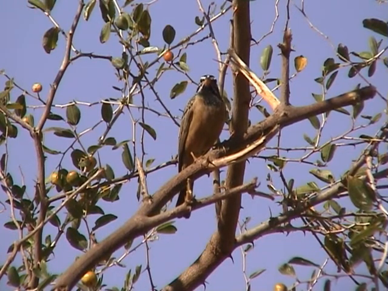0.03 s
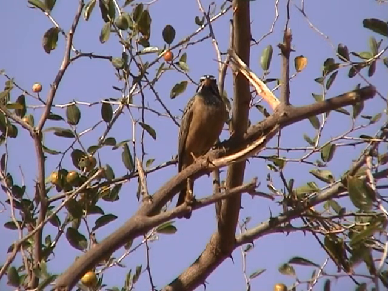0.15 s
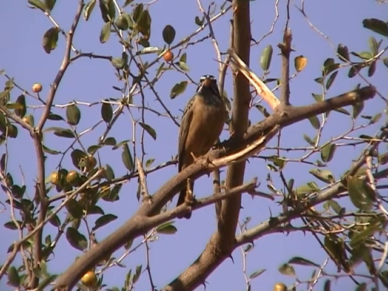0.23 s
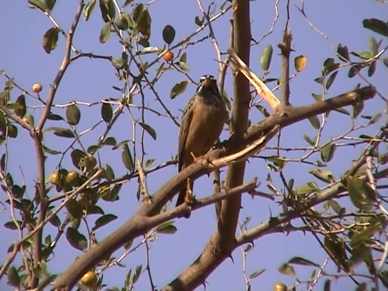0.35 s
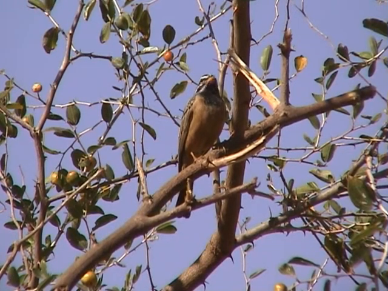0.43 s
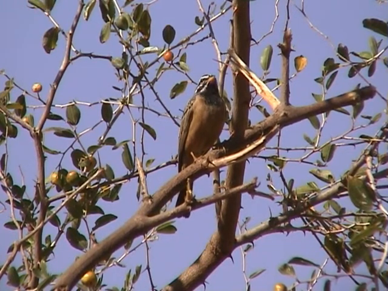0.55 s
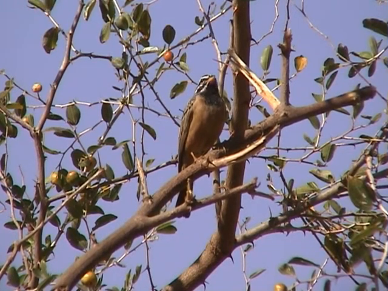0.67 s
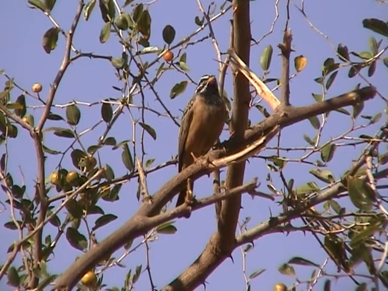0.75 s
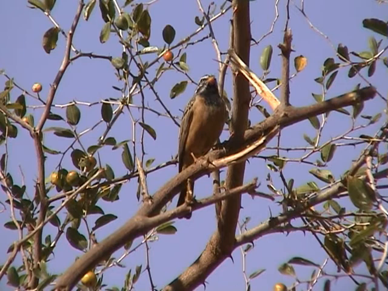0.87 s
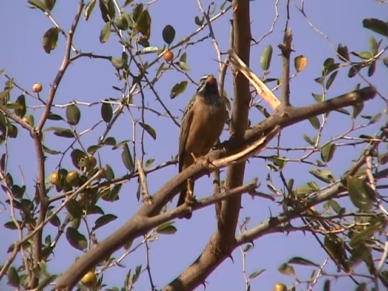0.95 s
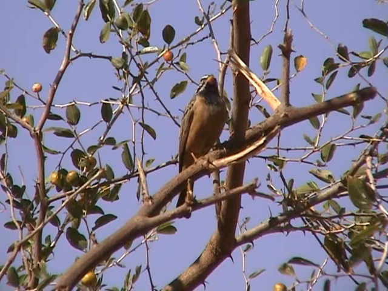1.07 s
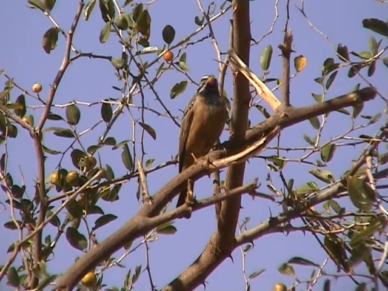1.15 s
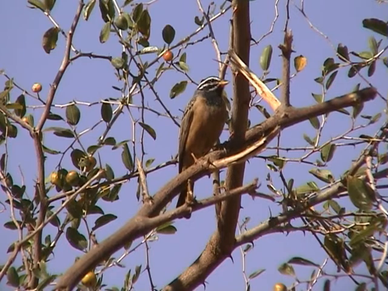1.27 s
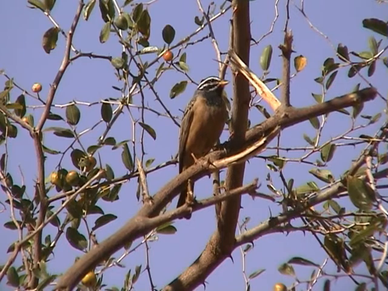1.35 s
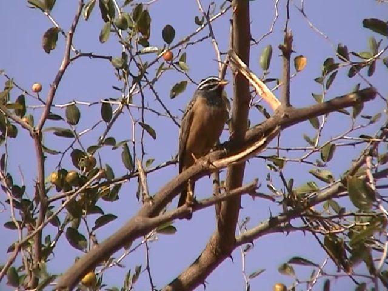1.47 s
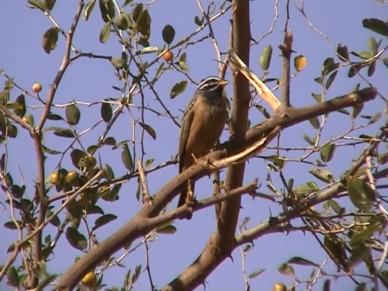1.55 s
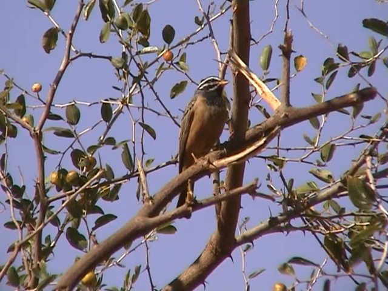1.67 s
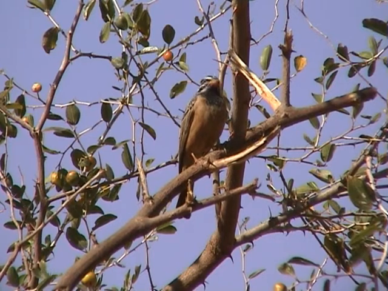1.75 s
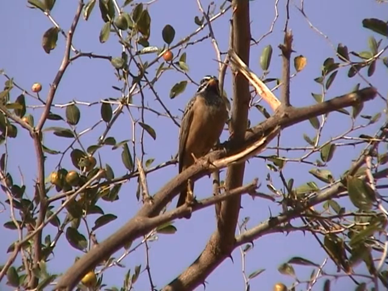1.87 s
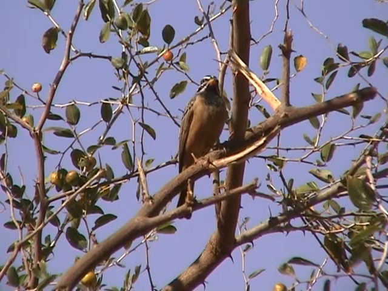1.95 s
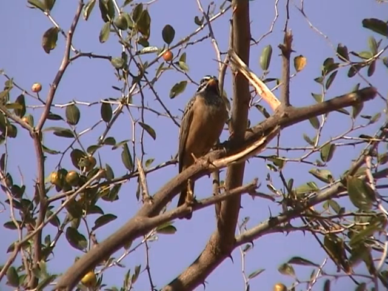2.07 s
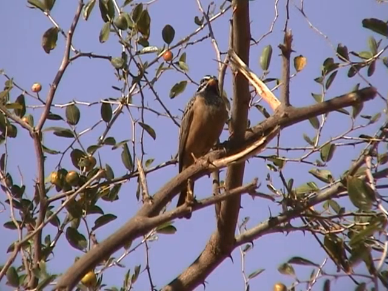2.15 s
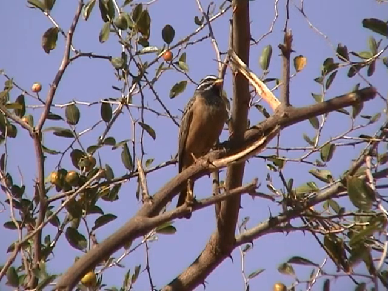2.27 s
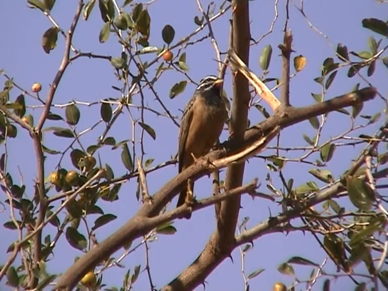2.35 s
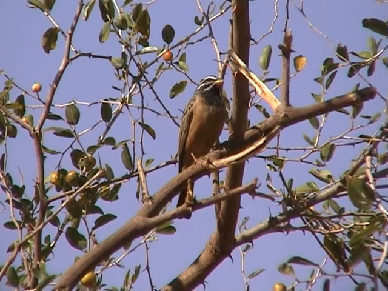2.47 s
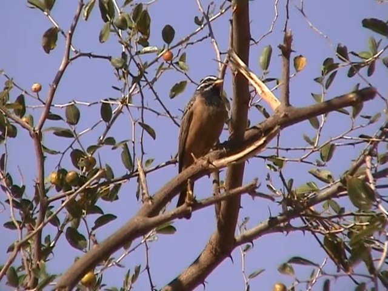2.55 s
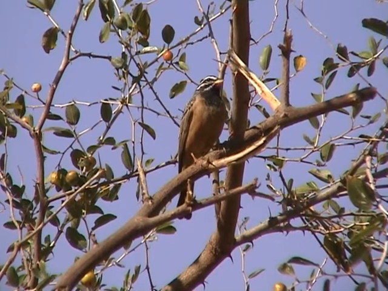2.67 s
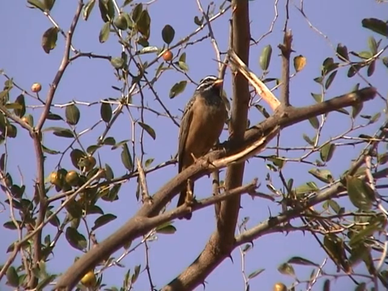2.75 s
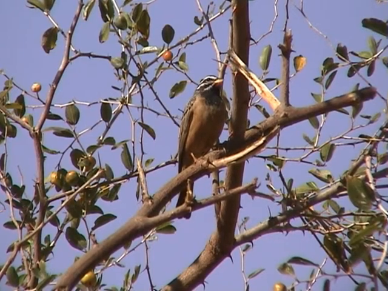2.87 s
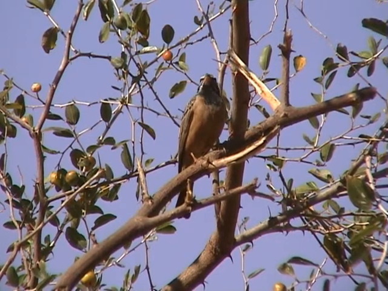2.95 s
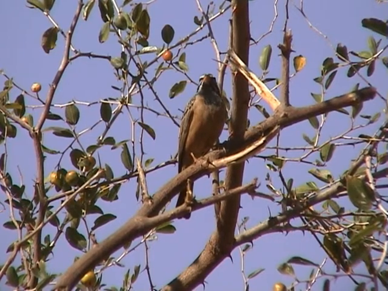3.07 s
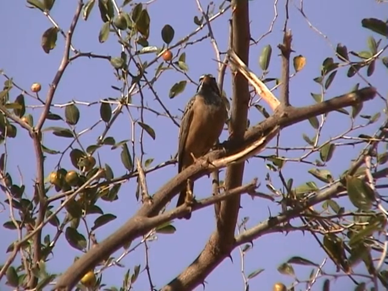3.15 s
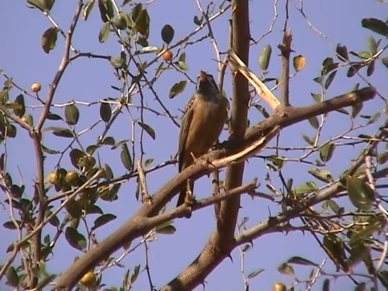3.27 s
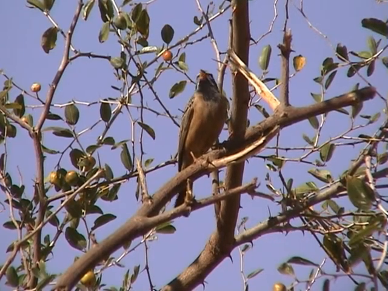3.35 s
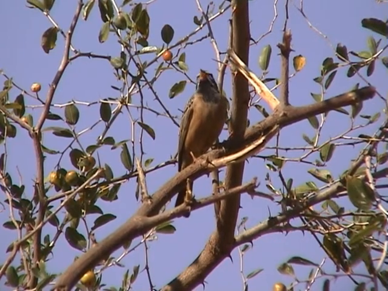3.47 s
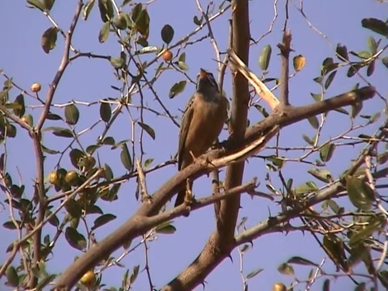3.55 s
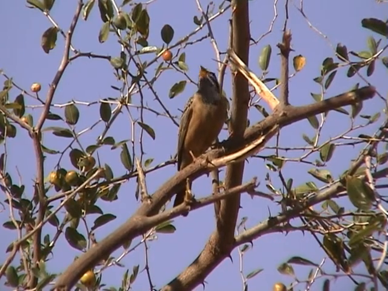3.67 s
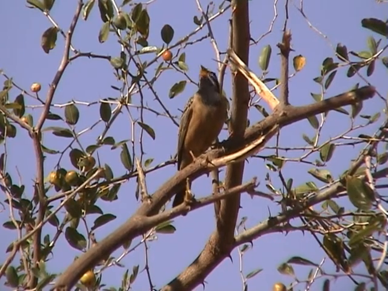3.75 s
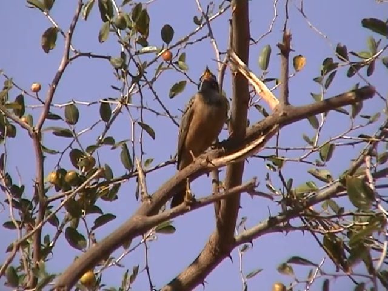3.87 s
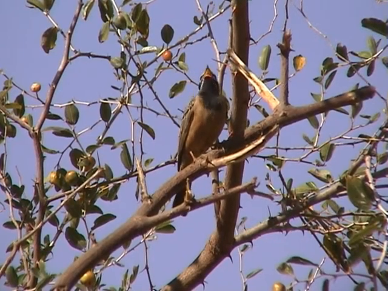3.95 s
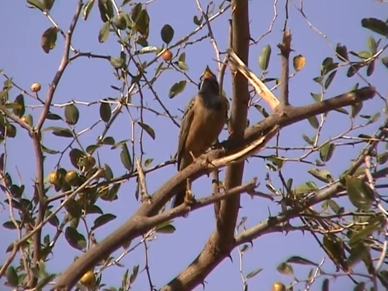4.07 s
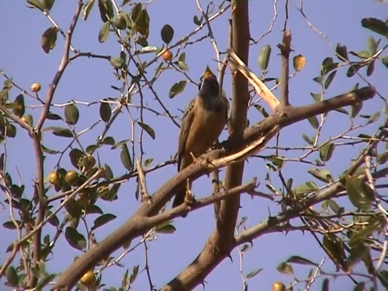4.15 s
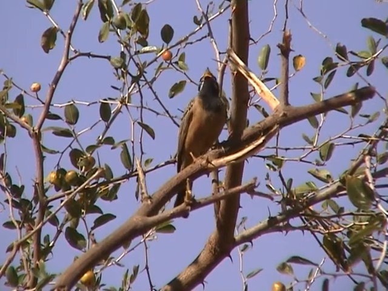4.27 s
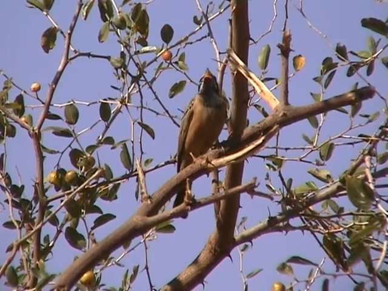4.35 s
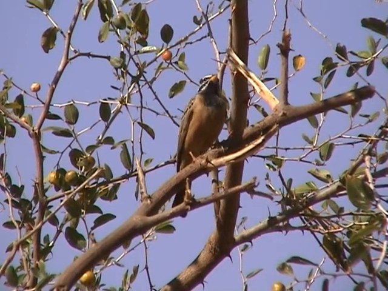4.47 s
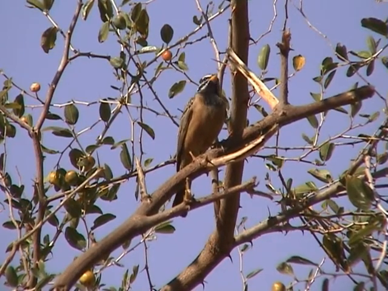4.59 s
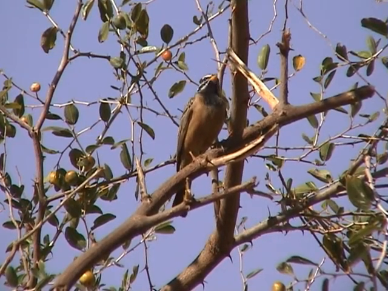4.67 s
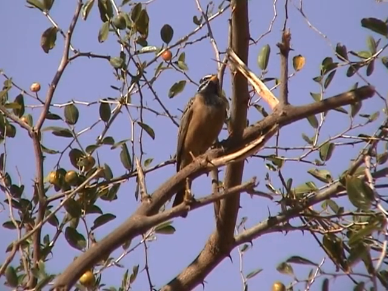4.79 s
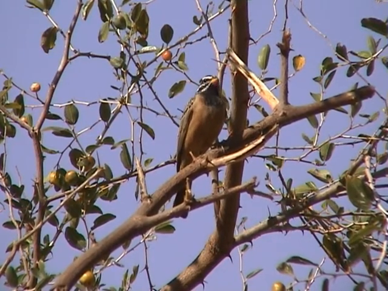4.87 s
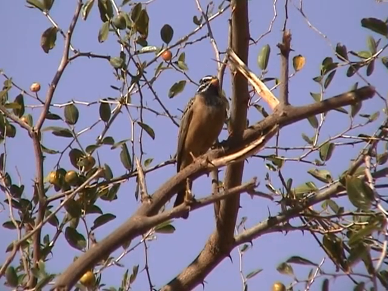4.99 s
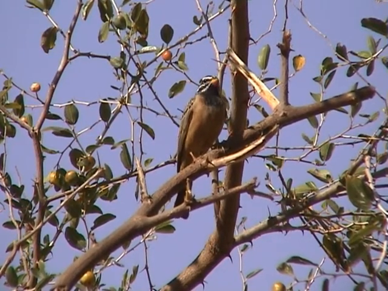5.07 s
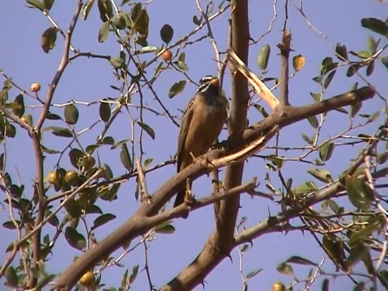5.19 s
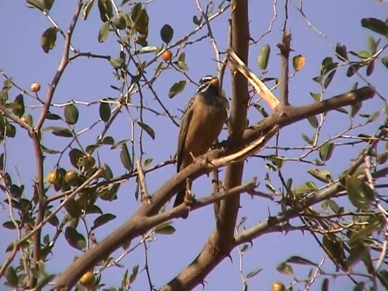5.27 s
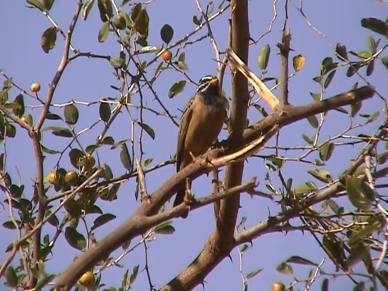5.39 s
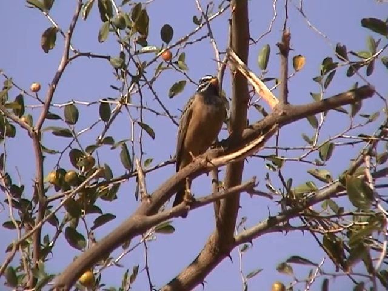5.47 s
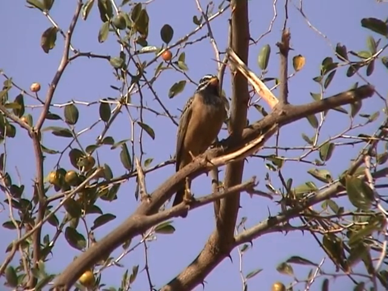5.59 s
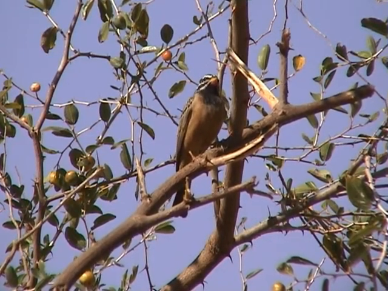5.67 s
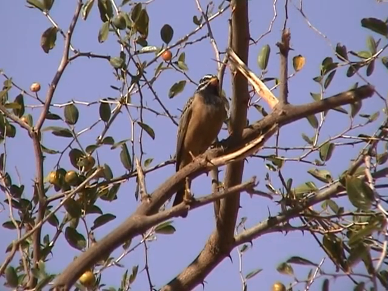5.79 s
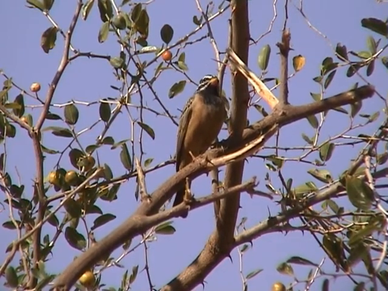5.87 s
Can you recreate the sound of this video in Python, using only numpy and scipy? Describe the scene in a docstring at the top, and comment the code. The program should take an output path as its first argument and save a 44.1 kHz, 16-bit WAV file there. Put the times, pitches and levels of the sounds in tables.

```python
"""Outdoors, on a thorn branch, a bunting sings one short phrase with its voice box: buzzes and thin
rising notes swell into loud falling sweeps and a warble. Nearby surfaces echo the song.
Far birds chip, rasp and trill faintly over a hiss, with soft blips and ticks of twigs and dry leaves.
A camera's drive throbs softly, its microphone distorts a little, and its uneven sampling
adds faint mirror tones (copies of the song at other pitches)."""
import sys
import numpy as np
from scipy import signal
from scipy.fft import rfft, irfft, next_fast_len
from scipy.io import wavfile
from scipy.ndimage import map_coordinates

SR = 44100
rng = np.random.default_rng(int(sys.argv[2]) if len(sys.argv) > 2 else 0)


def wav_record(signal):
    """Record a signal, one row per channel, as 16-bit PCM in the file named by sys.argv[1]."""
    frames = np.transpose(np.atleast_2d(signal))
    bounded = np.clip(frames, -1, 1)
    # unit amplitude maps onto the largest positive 16-bit level
    quanta = np.round(bounded * 32767).astype(np.int16)
    wavfile.write(sys.argv[1], SR, quanta)


N = 261513


def amp(db):
    """Turn decibels into a number to multiply by."""
    return 10 ** (np.asarray(db) / 20)


def unit(x):
    """Scale x to an average strength (rms) of 1."""
    return x / np.sqrt(np.mean(x ** 2) + 1e-20)


def along(points, hz):
    """Read between (frequency, value) points, with frequency on a log scale."""
    f, v = np.transpose(points)
    return np.interp(np.log(hz + 1), np.log(f + 1), v)


def wobble(rate, size):
    """A smooth curve through `rate` random values a second."""
    values = rng.standard_normal(int(size * rate / SR) + 4)
    return map_coordinates(values, [np.arange(size) * rate / SR])


def filtered(x, response):
    """Change the strength and phase of each frequency in x by response(hz)."""
    size = next_fast_len(N + SR // 4)
    return irfft(rfft(x, size) * response(np.fft.rfftfreq(size, 1 / SR)), size)[..., :N]


def add(track, s, sound):
    """Mix a sound into the track, starting at s seconds."""
    start = max(round(s * SR), 0)
    track[start:start + len(sound)] += sound[:max(N - start, 0)]


def whistle(hz, gain, waver, overtone_db=-31):
    """A nearly pure, slightly unsteady tone, as a bird's voice box makes."""
    unsteady_hz = hz * (1 + waver * wobble(710, size=len(hz)))
    phase = 2 * np.pi * np.cumsum(unsteady_hz) / SR
    return np.sqrt(2) * gain * (np.sin(phase) + amp(overtone_db) * np.sin(2 * phase))


def glide(length, start_hz, end_hz, db, bend=1, throat_db=0, buzz=0, buzz_hz=270, waver=0.0043):
    """A sliding note that swells and fades; buzz shakes its pitch evenly, waver at random."""
    progress = np.linspace(0, 1, max(int(length * SR), 32))
    shake = 1 + buzz * np.sin(2 * np.pi * buzz_hz * length * progress)
    hz = end_hz + (start_hz - end_hz) * (1 - progress) ** bend  # bend over 1: steep at first
    throat_hz = 5040  # the throat favours this pitch; an octave away, throat_db is lost
    gain = amp(db - throat_db * np.log2(hz / throat_hz) ** 2) * np.sin(np.pi * progress)
    return whistle(hz * shake, gain, waver=waver)


def scatter(x, t60, build):
    """Leaves and ground return a stereo blur of echoes that builds up, and falls 60 dB in t60 seconds."""
    t = np.arange(SR // 2) / SR
    tail = rng.standard_normal((2, len(t))) * amp(-60 * t / t60) * (1 - np.exp(-t / build))
    return signal.fftconvolve(x[None], tail / np.linalg.norm(tail[0]), axes=1)[:, :N]


def hiss(spectrum):
    """Stereo noise whose higher pitches mostly reach the right microphone earlier and louder."""
    # how alike the two sides are: f/Hz, likeness from 0 to 1
    likeness = [(60, -0.0), (150, 0), (380, 0.68), (950, 0.65), (2380, 0.28), (5980, 0.74), (15000, 0.39)]
    # how much louder the left is: f/Hz, level/dB
    balance = [(60, 2), (110, 1.5), (200, 1.5), (380, 2), (700, 0.5), (1290, -6.5), (2380, -7.5),
               (4400, -5), (8120, -4.5), (15000, 2.5)]
    # how far the left is ahead: f/Hz, phase/rad
    lead = [(100, 0), (260, 0.21), (950, -1.36), (1800, -1.04), (2500, 0.015), (7000, -1.35),
            (12000, -0.69)]

    def spread(hz):
        angle = np.arccos(np.clip(along(likeness, hz), 0, 1)) / 2
        return amp(along(spectrum, hz)) * np.array([np.cos(angle), np.sin(angle)])

    def lean(hz):
        half = np.array([[.5], [-.5]])
        return amp(half * along(balance, hz)) * np.exp(1j * half * along(lead, hz))

    mid, side = filtered(rng.standard_normal((2, N)), spread)
    return unit(filtered(np.array([mid + side, mid - side]), lean))


def open_air():
    """Outdoor hiss over a weak rumble, with two fluttering bands of noise."""
    # tone of the broad hiss: f/Hz, relative level/dB
    air_tone = [(120, -22.5), (200, -8.5), (240, -9.5), (366, -2.5), (472, -9), (577, -5), (803, -6),
                (2590, -11.5), (7890, -26.5), (15000, -37), (15800, -51)]
    # two resonances, where the noise is stronger: f/Hz, relative level/dB
    resonances = [(150, -52), (300, -3), (360, -2), (420, -9), (550, -8), (1100, -29), (1350, -3),
                  (1600, -15), (3000, -64)]
    # tone of the rumble: f/Hz, relative level/dB
    rumble_tone = [(15, -30), (30, -34), (60, 4), (110, 6.5), (150, 2), (200, 0), (300, -19.5)]
    air = amp(-44 + 0.46 * wobble(14, size=N)) * hiss(air_tone)
    flutter = amp(-55.5 + 3 * wobble(21.95, size=N)) * hiss(resonances)
    return air + flutter + amp(-63.5) * hiss(rumble_tone)


def rustle():
    """Dry leaves crackle at random: many tiny puffs of noise, a few of them stronger."""
    # tone of a crackle: f/Hz, relative level/dB
    tone = [(200, -25), (450, -4.5), (800, -3.5), (1300, -1.5), (2500, -7.5), (4000, -7), (8000, -38)]
    when, strength = rng.random((450, 2)).T
    taps = np.bincount((when * N).astype(int), amp(12 * strength ** 3), N)
    t = np.arange(SR // 20) / SR
    puffs = signal.fftconvolve(taps, amp(-60 * t / .035))[:N]
    return amp(-54) * unit(puffs * hiss(tone))


def camera_drive():
    """The drive's low tones add up to one soft thump a turn, louder on the left."""
    # tones of the drive: multiple of its turning rate, relative level/dB
    tones = [(4, -80), (5, -79), (6, -68), (7, -68), (8, -80), (10, -75), (12, -78), (17, -73), (18, -73),
             (19, -71), (20, -75)]
    turn_hz, first_beat_s = 12.71, .046
    turns = turn_hz * (np.arange(N) / SR - first_beat_s)
    throb = sum(np.sqrt(2) * amp(db) * np.sin(2 * np.pi * round(k) * turns) for k, db in tones)
    return amp(-2.5) * throb * amp([[2], [-2]])


def blips_and_twigs():
    """Soft low blips, and now and then a twig that ticks and rings for an instant."""
    # low blips: t/s, length/s, f/Hz, level/dB
    blips = [(0.057, .017, 590, -42.5), (1.02, .043, 379, -45), (1.352, 0.015, 594, -42),
             (1.556, 0.035, 584, -45.5), (2.214, 0.058, 585, -48.5), (2.976, 0.015, 554, -39.5),
             (2.996, .018, 602, -51), (3.433, .016, 638, -41), (4.872, 0.029, 554, -46)]
    # dry ticks of twigs: t/s, f/Hz, level/dB
    ticks = [(0.2584, 1580, -41), (2.5255, 2010, -41), (2.6595, 2120, -40), (3.2348, 1300, -40),
             (4.7655, 1430, -38.5), (5.601, 1170, -32.5), (5.8973, 2440, -33)]
    # tones a twig rings with: multiple of the tick's pitch, relative level/dB, time to fall 60 dB/s
    twig_tones = [(.31, 0, 0.025), (.46, 1, 0.016), (1, 6, 0.014)]
    out, t = np.zeros(N), np.arange(SR // 20) / SR
    for s, length, hz, db in blips:
        add(out, s, glide(length, hz, hz, db, waver=0.049))
    for s, hz, db in ticks:
        ring = sum(amp(level - 60 * t / t60) * np.cos(2 * np.pi * ratio * hz * t)
                   for ratio, level, t60 in twig_tones)
        add(out, s, amp(db) * ring * (1 - np.exp(-t / 0.00027)))
    return out + amp(-2) * scatter(out, t60=0.16, build=0.003)


def far_chips():
    """Far birds chip: each call is one quick slide in pitch."""
    # chips: t/s, length/s, start f/Hz, end f/Hz, level/dB
    chips = [(.05, 0.026, 2850, 2810, -48.5), (.15, 0.027, 2740, 2850, -49.5),
             (.258, 0.028, 2460, 2300, -48), (.337, .03, 2140, 1960, -49), (0.867, 0.004, 3250, 2900, -41),
             (0.93, .028, 6150, 4500, -49), (1.003, 0.02, 4880, 4000, -48.5),
             (1.073, .028, 7700, 6100, -50.5), (1.098, 0.015, 6400, 4030, -46.5),
             (1.133, 0.022, 4250, 3870, -50), (1.198, .018, 7400, 6400, -53),
             (1.245, 0.0313, 4050, 3370, -51.5), (1.324, .016, 5280, 4140, -51),
             (1.453, 0.02, 1590, 2070, -41.5), (2.31, .03, 3040, 2710, -51),
             (2.412, 0.048, 2050, 2830, -46), (2.553, 0.027, 2290, 2145, -42)]
    out = np.zeros(N)
    for s, length, start_hz, end_hz, db in chips:
        add(out, s, glide(length, start_hz, end_hz, db, waver=.012))
    return out


def far_trill():
    """A far bird's falling notes rock below and above a slowly climbing pitch."""
    start_s, every_s, count = 1.485, .0648, 14
    base_hz, swing_hz, climb_hz, fall = 2483, 59.6, 6.2, 0.096
    out = np.zeros(N)
    for k, chance in enumerate(rng.standard_normal(count)):
        hz = base_hz + k * climb_hz - (-1) ** k * swing_hz
        note = glide(0.0356, hz * (1 + fall), hz * (1 - fall), db=-50 + 0.9 * chance, waver=.04)
        add(out, start_s + k * every_s, note)
    return out


def far_rasps():
    """A far bird's hoarse calls: short swells of noise that come ever more slowly within a run."""
    # runs of calls: t/s, number of calls, level/dB
    runs = [(.18, 9, -52), (4.85, 1, -55), (5.235, 1, -48.5), (5.872, 1, -50)]
    # tone of the hoarse voice: f/Hz, relative level/dB
    tone = [(3000, -41), (4300, 0), (5300, 0.5), (5800, -11), (7000, -30)]
    first_gap_s, gap_growth_s = .29, .009
    t, gain = np.arange(N) / SR, np.zeros(N)
    for s, calls, db in runs:
        for k in range(round(calls)):
            gain += amp(db) * np.exp(-((t - s) / 0.023) ** 2)
            s += first_gap_s + k * gap_growth_s
    return gain * hiss(tone)[0]


def far_birds():
    """Calls from other trees, blurred by distance and a little to the right."""
    calls = far_chips() + far_trill() + far_rasps()
    return amp([[-2.5], [0.5]]) * (calls + amp(-1) * scatter(calls, t60=0.096, build=0.0017))


def surroundings(song):
    """Near surfaces add sharp echoes to the song, twigs blur it, and trees return a duller tail."""
    # near echoes: delay/s, gain (a minus flips the wave upside down)
    echoes = [(.004105, -.33), (.0081, .09), (.0107, .11), (.0182, .09)]
    # tone of the trees' echo: f/Hz, relative level/dB
    tree_tone = [(2500, 0.5), (5000, -1.5), (8000, -1.0)]
    near = filtered(song, lambda hz: 1 + sum(gain * np.exp(-2j * np.pi * hz * s) for s, gain in echoes))
    twigs = scatter(song, t60=0.047, build=0.0044)
    trees = filtered(scatter(song, t60=0.36, build=0.065), lambda hz: amp(along(tree_tone, hz)))
    return near * amp([[.2], [-.2]]) + amp(-9.5) * twigs + amp(-13) * trees


def opening():
    """One side of the voice box buzzes, higher each time; the other answers with rising whistles."""
    # buzzes: t/s, length/s, level/dB
    buzzes = [(3.415, 0.017, -50), (3.581, .018, -45.5), (3.691, 0.032, -42.5), (3.774, 0.028, -37),
              (3.859, .042, -33.5)]
    # thin rising whistles: t/s, level/dB
    rises = [(3.433, -40.5), (3.595, -38.5), (3.7065, -36), (3.7893, -34.5)]
    first_hz, climb_hz = 3250, 60
    out = np.zeros(N)
    for k, (s, length, db) in enumerate(buzzes):
        hz = first_hz + k * climb_hz
        add(out, s, glide(length, hz, hz, db, buzz=0.075, buzz_hz=275, waver=0.061))
    for s, db in rises:
        add(out, s, glide(length=.026, start_hz=5950, end_hz=7920, db=db, bend=2, waver=0.011))
    return out


def warble():
    """Quick, slightly rough downward slides, each 1 dB louder, settle on one short level tone."""
    start_s, every_s, slide_s, count = 4.055, .0118, .0125, 6
    out = np.zeros(N)
    starts = start_s + every_s * np.arange(count)
    for k, s in enumerate(starts):
        add(out, s, glide(slide_s, start_hz=4880, end_hz=3710, db=-25 + k, waver=0.015))
    add(out, starts[-1] + slide_s / 2, glide(length=.008, start_hz=4150, end_hz=4150, db=-30))
    return out


def closing_note():
    """The whistle drops steeply, eases into a steady downward slide and fades away."""
    length_s, attack_s, release_s, fade_db_per_s = .122, 0.014, 0.055, 147
    drop_hz, drop_s, slide_hz, slide_hz_per_s = 3016, .0058, 4903, 20900
    t = np.arange(int(length_s * SR)) / SR
    hz = slide_hz - slide_hz_per_s * t + drop_hz * np.exp(-t / drop_s)
    soft_ends = np.minimum(t / attack_s, 1) * np.minimum((length_s - t) / release_s, 1)
    return whistle(hz, soft_ends * amp(-15.5 - fade_db_per_s * t), waver=0.0072)


def bunting():
    """The near bird's phrase: opening notes, sweeps and flicks around a warble, and a closing note."""
    # falling sweeps: t/s, length/s, start f/Hz, end f/Hz, bend, level/dB at the throat's pitch
    sweeps = [(3.675, 0.0064, 5400, 4000, 1, -42.5), (3.758, .01, 5530, 3850, 0.93, -34.5),
              (3.843, .011, 5490, 3800, 0.92, -31.5), (3.883, 0.017, 7150, 5450, .9, -37),
              (3.9045, 0.024, 5900, 3930, 0.76, -20), (3.925, .016, 5100, 3050, 0.97, -28.5),
              (3.937, 0.0098, 7700, 5380, .9, -32), (3.984, 0.044, 8250, 4136, .85, -16.5),
              (4.035, .021, 8400, 4054, 2.2, -20.5), (4.162, .034, 8200, 4120, 1.1, -15.5),
              (4.237, 0.02, 8900, 4400, 1.96, -22.5)]
    # slides so short that they click: t/s, length/s, start f/Hz, end f/Hz, level/dB
    flicks = [(3.8955, 0.0018, 7000, 3730, -23.5), (3.943, .0045, 7370, 3900, -25),
              (4.0296, .0032, 3900, 7540, -24), (4.153, 0.0035, 4050, 7500, -28),
              (4.231, 0.0026, 4250, 7340, -26)]
    song = opening() + warble()
    for s, length, start_hz, end_hz, bend, db in sweeps:
        add(song, s, glide(length, start_hz, end_hz, db, bend=bend, throat_db=19.5, waver=0.0063))
    for s, length, start_hz, end_hz, db in flicks:
        add(song, s, glide(length, start_hz, end_hz, db))
    add(song, 4.258, closing_note())
    return song


def scene():
    """The bunting and its echoes, over far birds, small noises, open air and the camera's drive."""
    song = surroundings(bunting())
    return song + far_birds() + blips_and_twigs() + open_air() + rustle() + camera_drive()


def record(dry):
    """The microphone adds a low rasp to loud tones; uneven sampling adds faint mirror tones."""
    # ripples in the sampling clock, which tones are mirrored around: f/Hz, timing error/dB (0 = 1 sample)
    ripples = [(8000, -19), (12000, -8), (16000, -21), (20000, -11)]
    bass_cut_hz, top_hz = 150, 15950
    t = np.arange(N) / SR
    rasp = filtered(dry ** 2, lambda hz: hz ** 2 / (hz ** 2 + bass_cut_hz ** 2))
    mic = dry + amp(-16) * rasp
    timing_error = sum(amp(db) * np.cos(2 * np.pi * hz * t) for hz, db in ripples)
    timing_error += amp(-14) * rng.standard_normal(N)
    sampled = mic + timing_error * np.gradient(mic, axis=1)
    return filtered(sampled, lambda hz: hz < top_hz)


dry = scene()
out = record(dry)
wav_record(out)
```